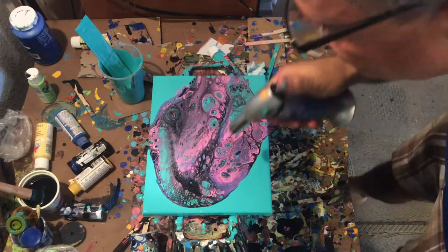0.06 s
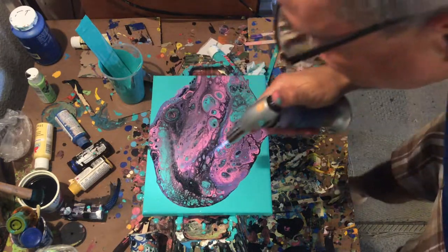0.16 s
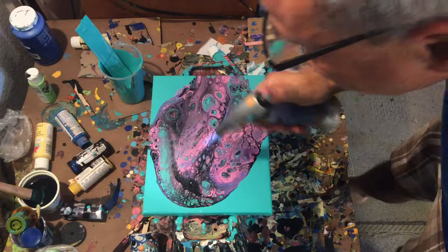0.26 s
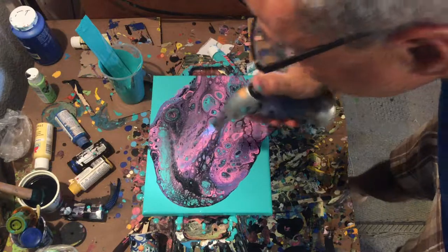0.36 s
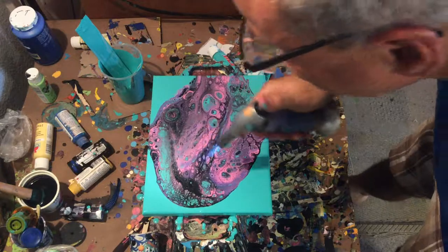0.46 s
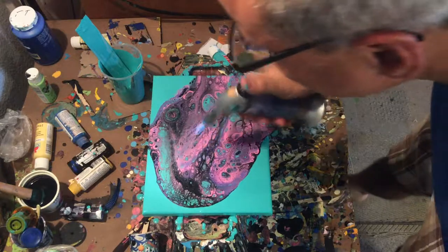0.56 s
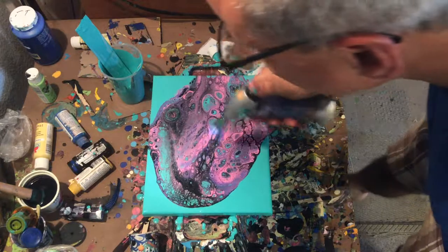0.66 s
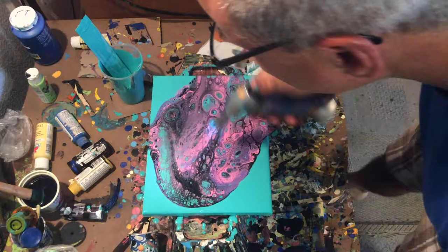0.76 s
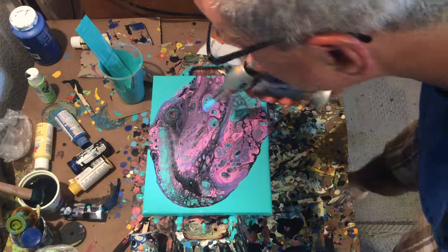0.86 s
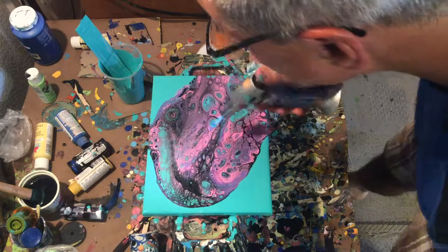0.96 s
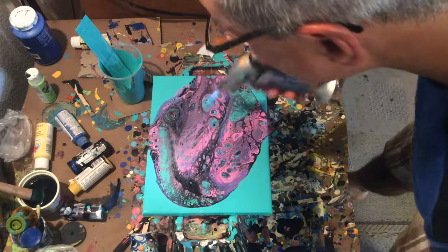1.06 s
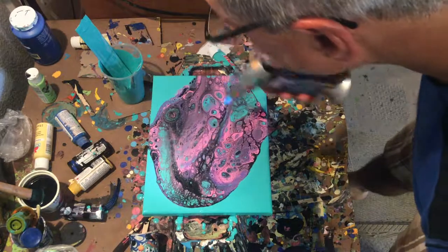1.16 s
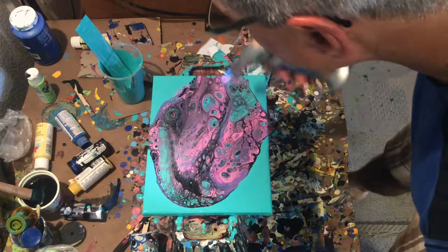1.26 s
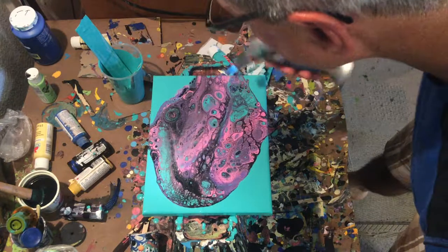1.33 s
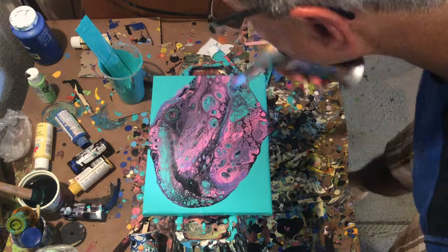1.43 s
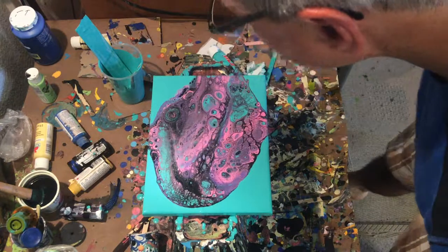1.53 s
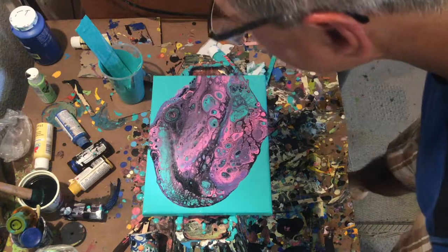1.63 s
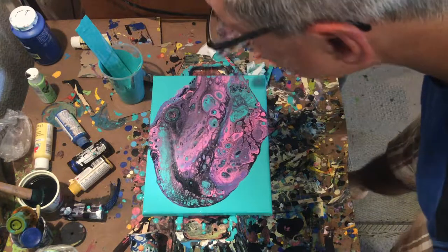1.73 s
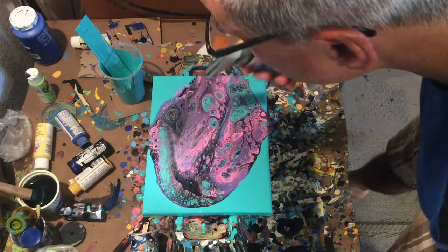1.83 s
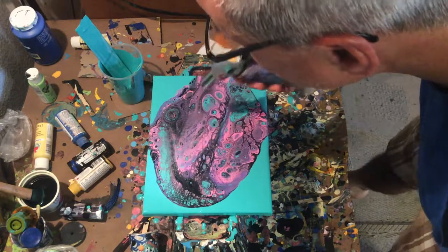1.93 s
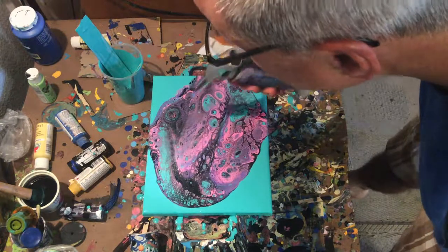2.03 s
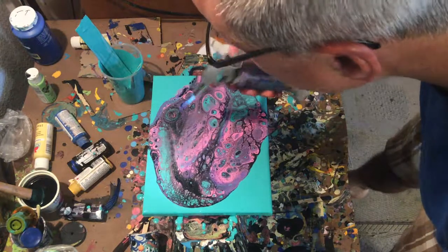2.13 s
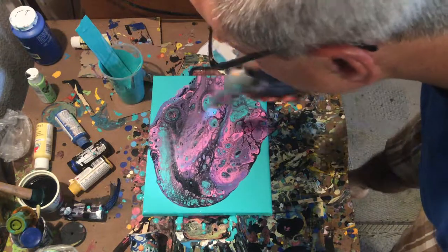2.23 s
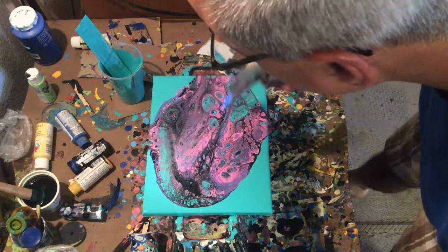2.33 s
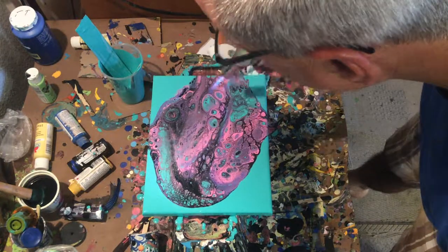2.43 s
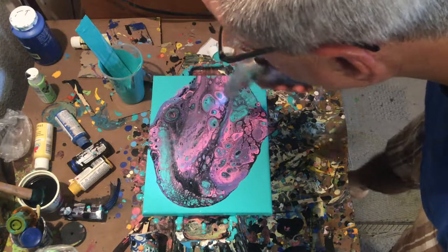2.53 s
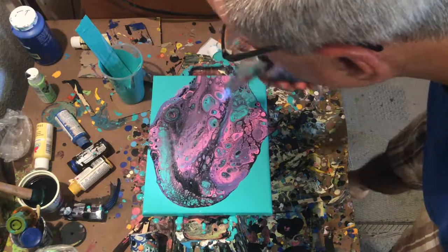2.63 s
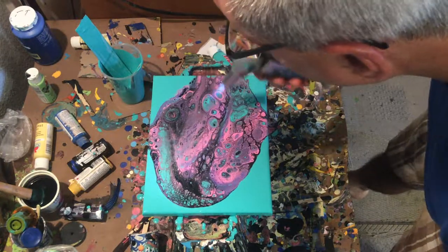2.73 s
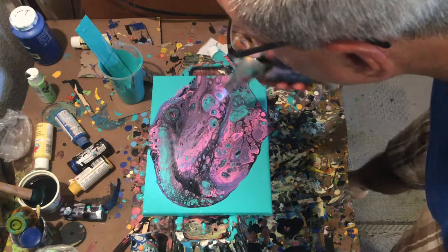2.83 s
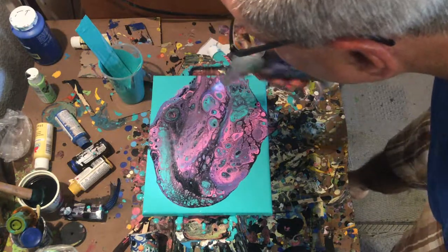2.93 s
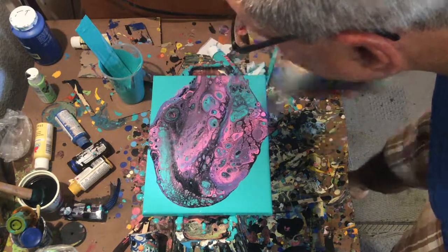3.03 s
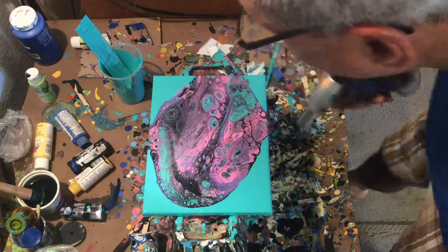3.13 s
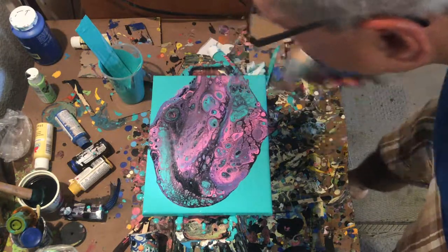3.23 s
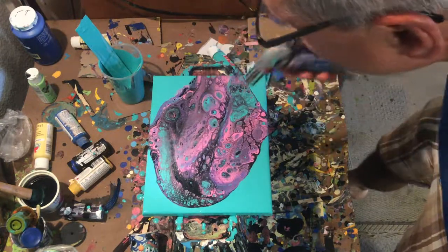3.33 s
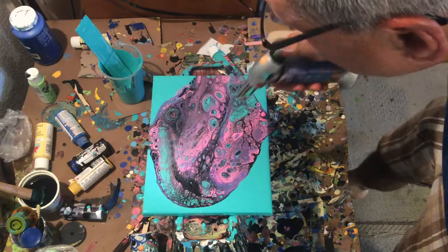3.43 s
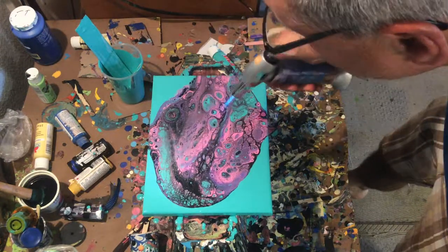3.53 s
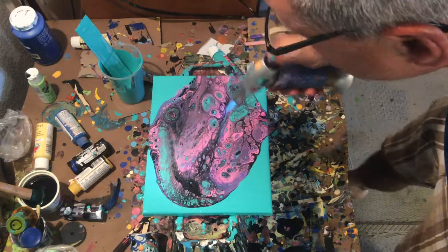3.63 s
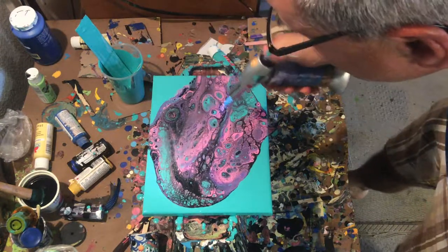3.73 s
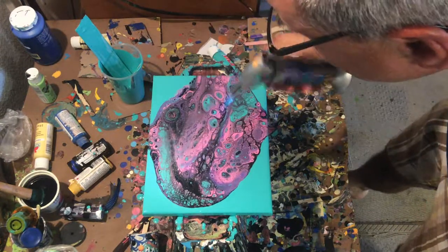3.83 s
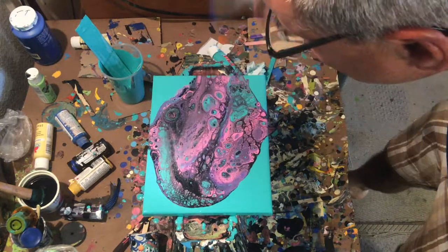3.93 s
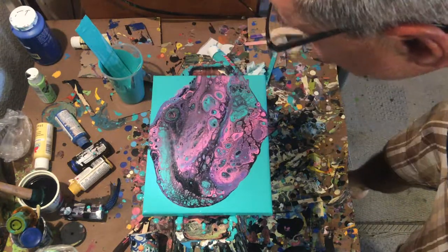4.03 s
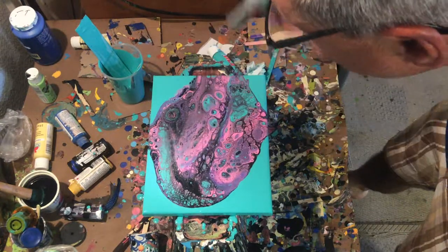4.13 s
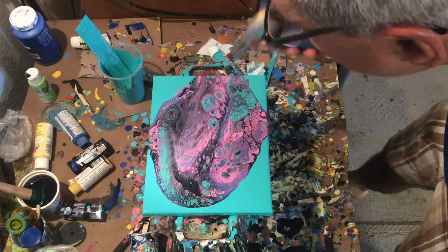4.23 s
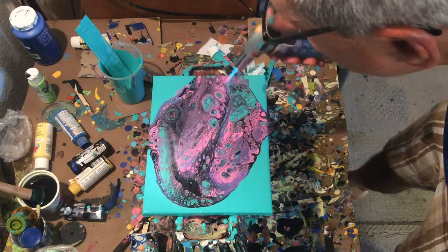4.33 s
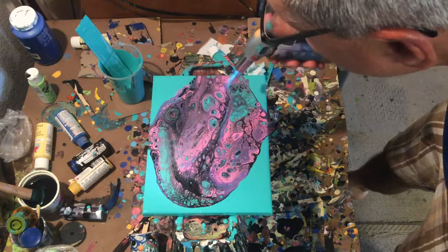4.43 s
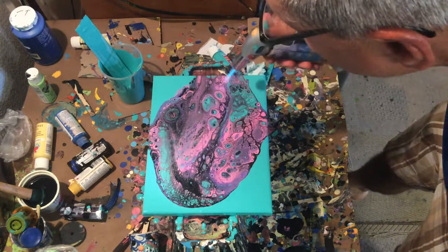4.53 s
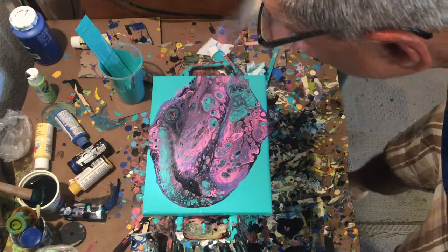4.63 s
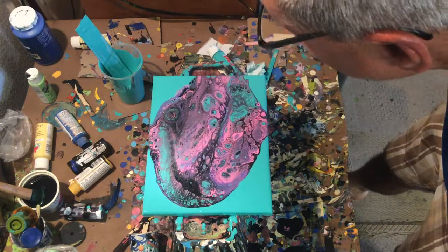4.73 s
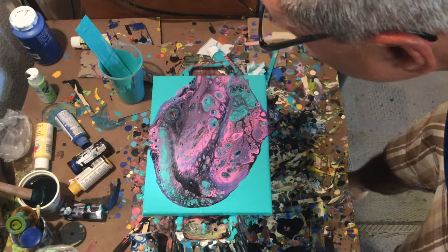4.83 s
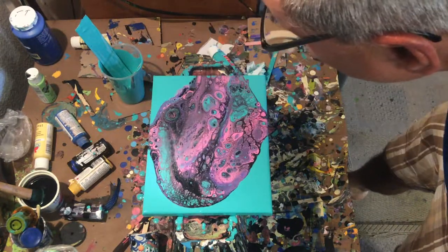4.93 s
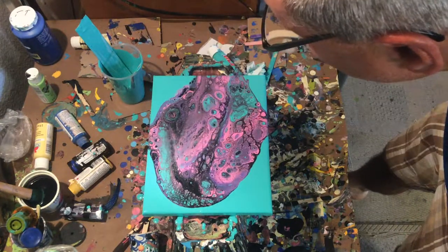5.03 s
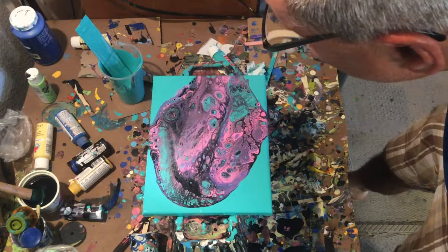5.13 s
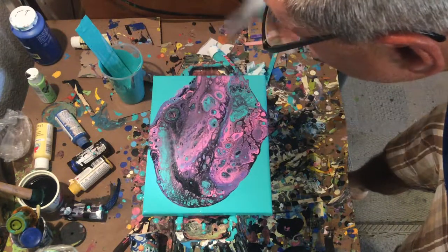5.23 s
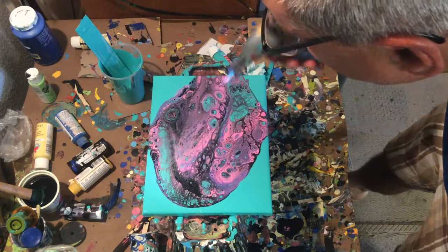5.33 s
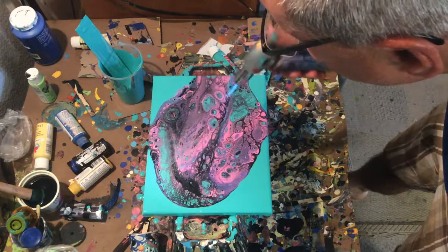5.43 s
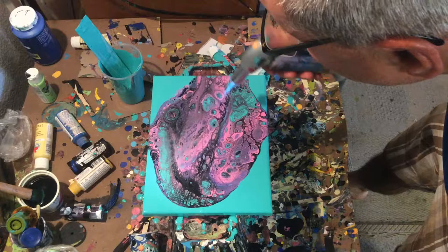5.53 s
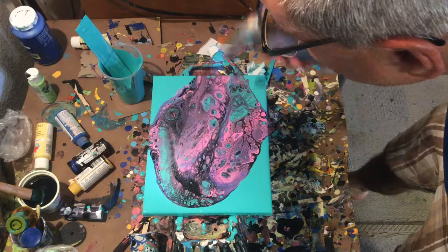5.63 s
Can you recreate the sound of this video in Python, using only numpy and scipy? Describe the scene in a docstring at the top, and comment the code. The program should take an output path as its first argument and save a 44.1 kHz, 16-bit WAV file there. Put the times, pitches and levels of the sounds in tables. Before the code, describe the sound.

A handheld butane torch lights with a sharp click, then burns with a soft hiss and an uneven, sputtering roar as it sweeps over a painted canvas. Light trigger ticks mark the flame going out. It is lit four more times, and the last three burns are brief. The clicks are close, far louder than the flame, and echo slightly in a workshop with a faint low hum.

```python
"""A handheld butane torch roars and sputters as its flame sweeps over a work table.
It is lit five times: the trigger opens the gas valve, then a spring hammer snaps the spark igniter.
The gas hisses and whistles at the nozzle, and the flame burns until the trigger is let go.
The clicks echo in a large room with hard walls, and a low hum lies under the noise of the air."""
import sys
import numpy as np
from scipy import signal
from scipy.fft import rfft, irfft, next_fast_len
from scipy.io import wavfile
from scipy.ndimage import uniform_filter1d, map_coordinates

SR = 44100
rng = np.random.default_rng(int(sys.argv[2]) if len(sys.argv) > 2 else 0)


def wav_out(sig):
    """Save sig, one row per channel (or a flat mono array), as 16-bit PCM at SR to the path in sys.argv[1]."""
    wavfile.write(sys.argv[1], SR, np.round(np.clip(np.atleast_2d(sig).T, -1, 1) * 32767).astype(np.int16))


N = 250047
T = np.arange(N) / SR


def amp(db):
    """Turn a level in dB into a number to multiply by."""
    return 10 ** (np.asarray(db) / 20)


def unit(x):
    """Scale x to an average strength (rms) of 1."""
    return x / np.sqrt(np.mean(x ** 2) + 1e-20)


def along(points, hz):
    """Read between (frequency, value) points on a log frequency scale."""
    freqs, values = np.transpose(points)
    return np.interp(np.log(hz + 1), np.log(freqs + 1), values)


def shaped(points):
    """A filter curve through (frequency, level) points."""
    return lambda hz: amp(along(points, hz))


def resonances(table, f):
    """A filter curve with one peak for each (frequency, width, level) row."""
    return sum((-1) ** k * amp(db) * 1j * f * width / (hz * hz - f * f + 1j * f * width)
               for k, (hz, width, db) in enumerate(table))


def filtered(x, response):
    """Pass x through a filter curve."""
    size = next_fast_len(N + SR // 2)
    return irfft(rfft(x, size) * response(np.fft.rfftfreq(size, 1 / SR)), size)[..., :N]


def noise(response, patchy_db):
    """Filtered noise of strength 1, with random louder and softer patches in time and pitch."""
    spectra = signal.stft(rng.standard_normal(N), nperseg=512)[2]
    patches = uniform_filter1d(rng.standard_normal(spectra.shape), size=5, axis=0)
    patches = unit(uniform_filter1d(patches, size=6, axis=1))
    patchy = signal.istft(spectra * amp(patchy_db * patches), nperseg=512)[1][:N]
    return unit(filtered(patchy, response))


def wobble(rate):
    """A smooth curve through `rate` random values a second."""
    return map_coordinates(rng.standard_normal(int(N * rate / SR) + 4), [T * rate])


def gate(starts, rise, ends, t60):
    """Swell in, hold, then fade. The fade time t60 is the seconds taken to drop by 60 dB."""
    return np.clip((T - starts) / rise, 0, 1) ** 2 * amp(-60 * np.maximum(T - ends, 0) / t60)


def ring(t, hz, t60, attack):
    """A fading tone with a soft start."""
    return np.sin(2 * np.pi * hz * t) * amp(-60 * t / t60) * (1 - np.exp(-t / attack))


def thud(t, hz, crest):
    """A soft, low swing that peaks about `crest` seconds in."""
    age = t / (crest + .002)
    return np.cos(2 * np.pi * hz * (t - crest)) * age ** 3 * np.exp(3 - 3 * age)


def add(track, s, sound):
    """Mix a sound in at s seconds."""
    part = track[max(round(s * SR), 0):][:len(sound)]
    part += sound[:len(part)]


# Tone of the air noise: f/Hz, relative level/dB
AIR_TONE = [(15, -75.5), (25, -39), (52, -8.5), (76, -3), (91, -24.5), (121, -3.5), (150, -17.5),
            (407, -12.5), (441, -14), (589, -9), (637, -12), (1170, -13), (2140, -14.5), (13500, -40)]
# Notes of the hum: f/Hz, level/dB, width/Hz
HUM_NOTES = [(63.5, -81.5, 4), (121.6, -71, 3)]
def workshop():
    """A wavering low hum lies under steady air noise."""
    hum = sum(amp(db) * noise(lambda f: 1 / (1 + ((f - hz) / width) ** 2), patchy_db=-2.5)
              for hz, db, width in HUM_NOTES)
    return hum + amp(-60.5) * noise(shaped(AIR_TONE), patchy_db=1.07)


# How long the room echoes: f/Hz, fade time/s
ECHO_TIMES = [(300, 0.32), (2000, 0.52), (6000, 0.56), (10000, 0.52), (15000, 0.24)]
def room_echo(knock):
    """The echo builds up late, once the far walls answer; the highest treble dies first."""
    hz, t, spectra = signal.stft(rng.standard_normal(SR), SR, nperseg=256)
    build = np.clip((t - .015) / 0.029, 0, 1)
    fade = amp(-60 * t / along(ECHO_TIMES, hz)[:, None])
    tail = signal.istft(spectra * build * fade, SR, nperseg=256)[1]
    echo = signal.fftconvolve(knock, tail)
    return echo / np.linalg.norm(echo)


# Where the plastic case rings: f/Hz, width/Hz, relative level/dB, fade time before stretching/s
CASE_RINGS = [(1532, 290, -6.5, 0.044), (2230, 400, -4.5, 0.027), (3325, 130, -16.5, 0.056),
              (4900, 300, -2.5, 0.03), (6450, 740, -8, 0.06), (7230, 260, 2.5, 0.017),
              (8210, 1000, -2, 0.066), (9220, 260, 2, 0.021), (10800, 430, -11, 0.036),
              (12730, 660, -5, 0.013), (14200, 340, 0.5, 0.01), (16360, 1600, -5, 0.01)]
def case_knock(t, low_hz, stretch, body_db, crack_db, echo_db):
    """One blow cracks against the plastic case and rattles its loose parts; the room answers."""
    size = 2 * len(t)
    hz = np.fft.rfftfreq(size, 1 / SR)
    body = 1 + amp(body_db) / (1 + 1j * hz / 2500) ** 2  # a duller blow feeds the low rings more
    ratio = 1j * hz / low_hz
    bass_cut = (ratio ** 2 / (1 + np.sqrt(2) * ratio + ratio ** 2)) ** 2  # small things give little bass
    crack = amp(crack_db) * 1j * hz / (1200 + 1j * hz)
    curves = body * bass_cut * np.array([resonances([row[:3]], hz) for row in CASE_RINGS] + [crack])
    t60 = stretch * np.array([row[3] for row in CASE_RINGS] + [.025])[:, None]
    rattles = rng.standard_normal((len(t60), len(t))) * amp(-60 * t / t60) * (1 - np.exp(-t / .0003))
    parts = rfft(rattles, size) * curves
    direct = irfft(parts.sum(0))[:len(t)]
    signs = (-1) ** np.arange(len(t60))[:, None]  # flipping every other ring keeps the dips shallow
    out = amp(echo_db) * room_echo(irfft((signs * parts).sum(0))[:len(t)])
    add(out, 0, direct / np.linalg.norm(direct))
    return out


# The trigger is pressed: t/s, click level/dB, thud level/dB
TRIGGER_PRESSES = [(0.2022, -28, -42.5), (2.155, -27, -46.5), (3.583, -36, -46), (4.389, -36, -46),
                   (5.4, -29.5, -46.5)]
# The trigger is let go or the grip shifts: t/s, level/dB, added body/dB
LIGHT_TICKS = [(1.604, -23.5, 4.5), (1.636, -31.5, 0.5), (2.603, -37.5, 2), (3.0731, -18, -11),
               (3.093, -28, 2.5), (3.334, -39, 3.5), (3.945, -19.5, -2), (3.97, -23.5, 15.5),
               (3.993, -40, 10.5), (4.1994, -43, 4), (4.724, -18, -20), (5.2855, -46.5, -4),
               (5.314, -39.5, 1)]
def trigger():
    """Pressing makes a dull click and a thud; letting go or shifting the grip makes light ticks."""
    out, t = np.zeros(N), T[:SR // 16]
    for s, db, thud_db in TRIGGER_PRESSES:
        click = case_knock(t, low_hz=450.4, stretch=1.3, body_db=25.5, crack_db=-11, echo_db=-9)
        add(out, s, amp(db) * click)
        add(out, s - .002, amp(thud_db) * thud(t, hz=130, crest=0.002))
    for s, db, body_db in LIGHT_TICKS:
        tick = case_knock(t, low_hz=454, stretch=1.25, body_db=body_db, crack_db=-4, echo_db=-12)
        add(out, s, amp(db) * tick)
    return out


# Igniter snaps: t/s, strike level/dB, bounce delay/s, bounce level/dB, thump level/dB, pop level/dB
IGNITER_SNAPS = [(0.2298, 4, 0.0015, 1.5, -28.5, -21), (2.1752, 5, .00207, -3.5, -37, -35),
                 (3.6168, 3.5, .00167, 1.5, -30, -8.5), (4.4248, 3.5, .0014, 2.5, -30, -17),
                 (5.4368, 2, 0.0017, 3.5, -28, -21)]
def igniter():
    """The spring hammer strikes and bounces amid a low thump, and the gas lights with a pop."""
    out, t = np.zeros(N), T[:SR // 8]
    pop = -ring(t, hz=398, t60=0.0051, attack=.0004)
    thump = thud(t, hz=103, crest=.0075) + amp(-4) * thud(t, hz=73.4, crest=0.0098)
    for s, db, bounce_s, bounce_db, thump_db, pop_db in IGNITER_SNAPS:
        strike = case_knock(t, low_hz=1110, stretch=0.4, body_db=-11.5, crack_db=-18, echo_db=-13)
        bounce = case_knock(t, low_hz=1130, stretch=1.56, body_db=-5, crack_db=-9.5, echo_db=-15)
        add(out, s, amp(db) * strike)
        add(out, s + bounce_s, amp(bounce_db) * bounce)
        add(out, s - .007, amp(thump_db) * thump)
        add(out, s + .0008, amp(pop_db) * pop)
    return out


# Tone of the gas jet: f/Hz, relative level/dB
HISS_TONE = [(2500, -39), (4300, -16.5), (4900, -10), (5300, 2.5), (5700, -3.5), (7000, -8.5), (8600, -9),
             (10900, -12), (12000, -25), (14300, -12), (15000, -20), (16000, -32.5)]
# The gas valve: opens/s, shuts/s, hiss level/dB, whistle level/dB
VALVE_OPENINGS = [(0.183, 1.673, -63, -64), (2.132, 3.149, -65, -64.5), (3.556, 4.012, -61.5, -63),
                  (4.364, 4.787, -63, -63), (5.379, 5.7, -60, -53.5)]
def gas_hiss():
    """Gas hisses from the nozzle while the valve is open and fades in the room once it shuts."""
    level = sum(amp(db) * gate(opens, rise=0.026, ends=shuts, t60=0.33)
                for opens, shuts, db, _ in VALVE_OPENINGS)
    return level * amp(0.46 * wobble(8.5)) * noise(shaped(HISS_TONE), patchy_db=.7)


# Pitch of the whistle: t/s, f/Hz
WHISTLE_PITCH = [(.5, 7680), (1.25, 7640), (1.45, 7720), (2.45, 8100), (2.75, 7580), (3.07, 7600),
                 (3.9, 7680), (4.65, 7780)]
def nozzle_whistle():
    """A narrow band of noise sings at the nozzle, its pitch drifting as the torch turns."""
    # It waits for the flame and breaks off as the valve begins to close.
    level = sum(amp(db) * gate(opens + 0.088, rise=0.26, ends=shuts - 0.053, t60=0.42)
                for opens, shuts, _, db in VALVE_OPENINGS)
    waver = amp(0.53 * wobble(5.91))
    pitch_hz = np.interp(T, *np.transpose(WHISTLE_PITCH))
    phase = 2 * np.pi * np.cumsum(pitch_hz) / SR
    slow_a, slow_b = (noise(lambda f: 1 / (1 + (f / 300) ** 2), patchy_db=2.5) for _ in range(2))
    return level * waver * (slow_a * np.cos(phase) + slow_b * np.sin(phase))


# Tone of the sputter: f/Hz, relative level/dB
SPUTTER_TONE = [(820, -16), (1400, -0.5), (1710, -12.5), (2270, -10), (2590, -20.5), (3330, -10.5),
                (4600, -17), (7500, -21.5), (15500, -30.5)]
def surface_sputter(flutter):
    """The flame spits in quick, uneven bursts where it meets the surface."""
    flicker = amp(1.2 * flutter + 1.2 * wobble(300))
    return unit(flicker * noise(shaped(SPUTTER_TONE), patchy_db=1))


# Where the burner tube rings: f/Hz, width/Hz, relative level/dB
TUBE_RINGS = [(473, 106, -4), (676, 130, -2), (781.3, 47.8, 4), (1215, 42, -6), (1493, 130, -12)]
def tube_roar(flutter):
    """Swirling, burning gas makes the burner tube ring with a fluttering roar."""
    flicker = amp(1.7 * flutter + 0.44 * wobble(120))
    return unit(flicker * noise(lambda f: resonances(TUBE_RINGS, f), patchy_db=2.1))


# Each burn: catches/s, goes out/s, roar level/dB, sputter level/dB, rumble level/dB
BURNS = [(0.222, 1.63, -59, -67.5, -59.5), (2.215, 3.092, -55.5, -61.5, -61.5),
         (3.62, 4.006, -54.5, -63.5, -66), (4.407, 4.77, -58.5, -68, -64), (5.44, 5.706, -56, -78, -60.5)]
# Surges as the flame meets the surface: t/s, length/s, flare level/dB, sputter level/dB
SURFACE_SURGES = [(0.324, .03, -66, -72), (0.549, 0.015, -62, -64), (0.642, 0.045, -54.5, -57.5),
                  (0.703, 0.037, -51.5, -52.5), (0.79, 0.04, -58.5, -59), (0.923, 0.076, -57, -55.5),
                  (1.045, 0.028, -53, -57), (1.165, 0.044, -56.5, -54.5), (1.265, 0.026, -53.5, -63),
                  (1.368, 0.042, -44.5, -51), (1.446, 0.018, -53, -65), (1.587, 0.04, -48, -47),
                  (2.421, 0.054, -50.5, -51.5), (2.618, 0.017, -54.5, -52.5), (2.714, 0.039, -50, -60),
                  (2.77, 0.013, -51.5, -65), (3.063, 0.02, -53, -55.5), (3.966, .025, -71, -56.5),
                  (4.755, 0.038, -74, -59), (5.58, 0.03, -53.5, -71.5)]
def flame():
    """The flame roars, sputters and rumbles, and flares up as it meets the surface."""
    power = np.zeros((4, N))  # rows: roar, sputter, rumble, flare
    for catches, goes_out, *levels_db in BURNS:
        burning = gate(catches, rise=0.039, ends=goes_out, t60=0.26)
        power[:3] += (amp(levels_db)[:, None] * burning) ** 2
    for s, length, flare_db, sputter_db in SURFACE_SURGES:
        swell = 1 / np.cosh(np.clip((T - s) / length * 2, -30, 30))
        rumble_db = flare_db - 12.5
        power[1:] += (amp([[sputter_db], [rumble_db], [flare_db]]) * swell) ** 2
    flutter = wobble(45)  # shared, so roar and sputter flicker together
    roar = tube_roar(flutter)
    flare = unit(filtered(roar, lambda f: 1 / np.sqrt(1 + (620 / (f + 1)) ** 4)))  # a thinner roar
    sputter = surface_sputter(flutter)
    lumps = amp(.6 * wobble(30) + 2.2 * wobble(14))
    rumble = unit(lumps * noise(lambda f: resonances([(147, 101, 0)], f) ** 2, patchy_db=2.2))
    return (np.sqrt(power) * [roar, sputter, rumble, flare]).sum(0)


def scene():
    """Add all the sounds together, the same on the left and the right."""
    mix = igniter() + trigger() + gas_hiss() + nozzle_whistle() + flame() + workshop()
    return np.tile(mix, (2, 1))


def record(dry):
    """The highest treble falls away steeply, leaving nothing above top_hz."""
    top_hz, slope_hz = 17000, 1700
    return filtered(dry, lambda hz: np.sin(np.pi / 2 * np.clip((top_hz - hz) / slope_hz, 0, 1)) ** 6)


dry = scene()
out = record(dry)
wav_out(out)
```